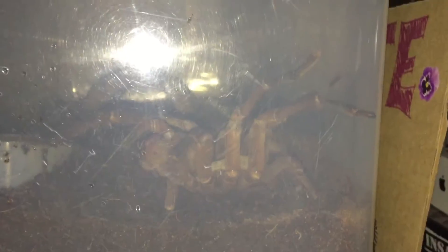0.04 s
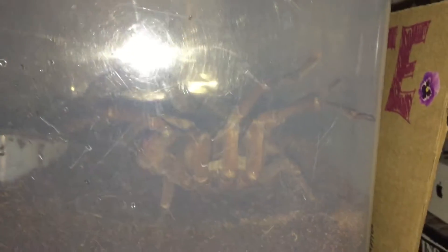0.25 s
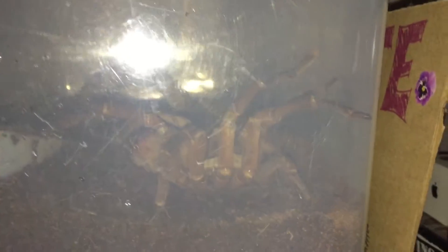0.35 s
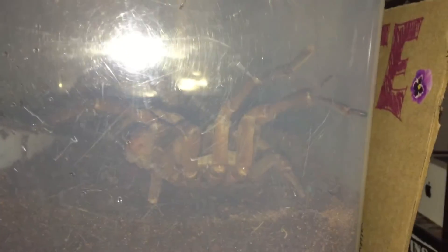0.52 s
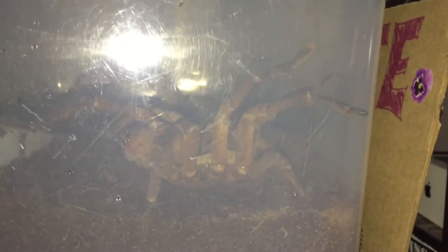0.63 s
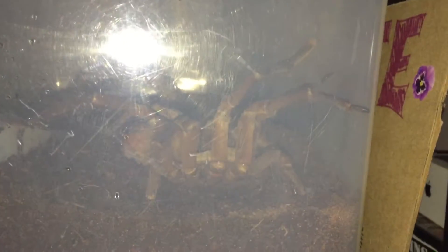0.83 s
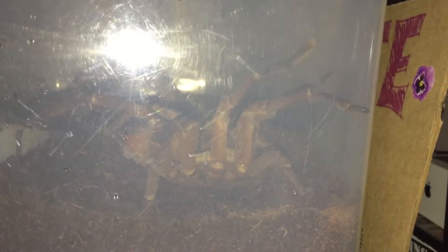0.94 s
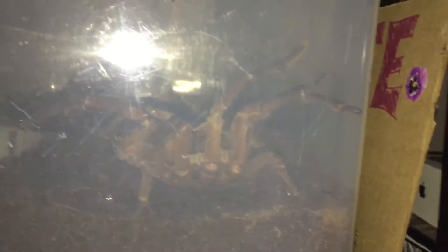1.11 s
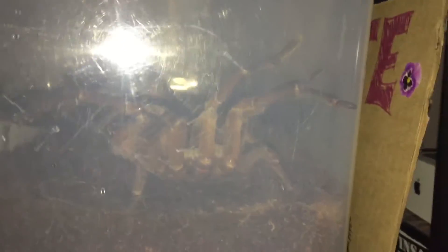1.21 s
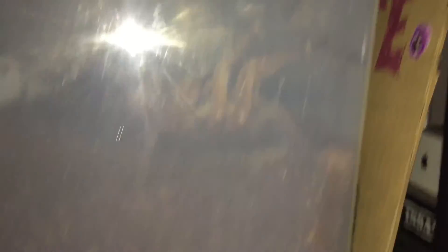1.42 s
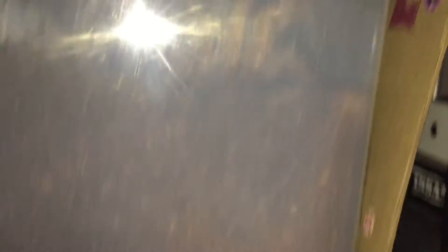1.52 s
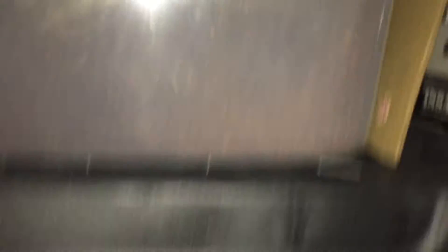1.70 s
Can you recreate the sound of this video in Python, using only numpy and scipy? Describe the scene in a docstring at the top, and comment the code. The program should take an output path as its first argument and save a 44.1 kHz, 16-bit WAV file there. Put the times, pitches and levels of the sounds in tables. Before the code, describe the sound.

Quick, even, low knocks of a tarantula drumming on a plastic wall, after one small click.

```python
"""One sharp plastic click, close by, over the low hum and quiet hiss of a small room.
Then a tarantula drums nine times on its plastic enclosure, about seven knocks a second, with soft
thuds in between and tiny claw scratches. Each knock rings the same wall, whose bending waves bring
the treble ahead of the bass. The room answers briefly; one microphone hears it all."""
import sys
import numpy as np
from scipy import signal
from scipy.fft import rfft, irfft, next_fast_len
from scipy.io import wavfile

SR = 44100
rng = np.random.default_rng(int(sys.argv[2]) if len(sys.argv) > 2 else 0)


def wav_out(sig):
    """Save sig, one row per channel (or a flat mono array), as 16-bit PCM at SR to the path in sys.argv[1]."""
    wavfile.write(sys.argv[1], SR, np.round(np.clip(np.atleast_2d(sig).T, -1, 1) * 32767).astype(np.int16))


N = 77175


def amp(db):
    """Decibels to gain."""
    return 10 ** (np.asarray(db) / 20)


def unit(x):
    """Scale to rms 1."""
    return x / np.sqrt(np.mean(x ** 2) + 1e-20)


def since(start):
    """Seconds since start, zero before."""
    return np.maximum(np.arange(N) / SR - start, 0)


def fade(t, t60):
    """Exponential decay, 60 dB down after t60 seconds."""
    return 1000 ** (-t / t60)


def curve(points):
    """(t/s, value) points joined by straight lines, one value per sample."""
    return np.interp(since(0), *np.transpose(points))


def filtered(x, response):
    """x through a gain that depends on frequency."""
    size = next_fast_len(N + SR // 2)
    return irfft(rfft(x, size) * response(np.fft.rfftfreq(size, 1 / SR)), size)[:N]


def coloured(x, spectrum):
    """x shaped by (f/Hz, gain/dB) points on a log frequency axis."""
    points_hz, db = np.transpose(spectrum)
    return filtered(x, lambda hz: amp(np.interp(np.log(hz + 1), np.log(points_hz), db)))


def noise(spectrum):
    """Coloured noise of rms 1."""
    return unit(coloured(rng.standard_normal(N), spectrum))


def ring(start, hz, t60, rise_cycles=.688):
    """One mode that builds up from its start and dies away."""
    t = since(start)
    return np.sin(2 * np.pi * hz * t) * fade(t, t60) * (1 - np.exp(-t * hz / rise_cycles))


def burst(start, spectrum, t60):
    """A short crack of noise."""
    t = since(start)
    return noise(spectrum) * (t > 0) * fade(t, t60)


# Colour of the room's answer: f/Hz, gain/dB
ROOM_SPECTRUM = [(80, -26), (150, -20), (280, -3), (450, -6), (650, -6.5), (850, -3), (1200, -4), (1550, 5),
                 (2600, -2), (3600, 3.5), (5000, 8), (12000, -10)]
def in_room(direct, send_db=-10, t60=0.14, build_s=0.0064):
    """The direct sound, then the short, diffuse tail of a small room, which holds little bass."""
    t = np.arange(SR // 3) / SR
    tail = rng.standard_normal(len(t)) * fade(t, t60) * (1 - np.exp(-(t / build_s) ** 2))
    low_cut = signal.butter(3, 220, "high", fs=SR, output="sos")
    tail = signal.sosfilt(low_cut, tail / np.linalg.norm(tail))
    reverb = coloured(signal.fftconvolve(direct, tail)[:N], ROOM_SPECTRUM)
    return direct + amp(send_db) * reverb


# Room tone around the microphone: f/Hz, relative level/dB
ROOM_TONE_SPECTRUM = [(20, 3), (45, -28), (70, 0), (120, 3.5), (170, -10.5), (330, -13), (500, -9),
                      (680, -18.5), (1500, -20.5), (2600, -22.5), (3500, -32), (6000, -35), (10000, -40),
                      (16000, -43.5)]
# Its slight drift: t/s, level/dB
ROOM_TONE_LEVEL = [(0, -56), (.18, -56), (.25, -54), (1.25, -56), (1.5, -57), (1.75, -57)]
def room_tone():
    """A nearly steady bed of rumble and quiet hiss."""
    return amp(curve(ROOM_TONE_LEVEL)) * noise(ROOM_TONE_SPECTRUM)


# Swells and dips of the hum's fundamental: t/s, level/dB
HUM_LEVEL = [(0.0, -77), (0.204, -60), (0.262, -59), (0.574, -52.5), (0.638, -80), (0.686, -66),
             (0.9, -46.5), (1.184, -48), (1.48, -55.5), (1.52, -88), (1.696, -56), (1.75, -56)]
def hum(hz=58.8, octave_db=-63):
    """A low hum in the room, wavering under its steady octave."""
    phase = 2 * np.pi * hz * since(0)
    return amp(curve(HUM_LEVEL)) * unit(np.sin(phase)) + amp(octave_db) * unit(np.sin(2 * phase))


# A whine far in the background: t/s, level/dB
WHINE_LEVEL = [(0, -71.5), (.5, -67.5), (.95, -69), (1.06, -64), (1.13, -69.5), (1.24, -62), (1.35, -70),
               (1.75, -73.5)]
def whine(centre_hz=1212, half_width_hz=54):
    """A faint, fuzzy tone: a narrow band of noise."""
    band = filtered(rng.standard_normal(N), lambda hz: 1 / (1 + ((hz - centre_hz) / half_width_hz) ** 2))
    return amp(curve(WHINE_LEVEL)) * unit(band)


# Claws on the plastic, close and dry: t/s, level/dB
CLAW_SKIDS = [(.528, -66), (.544, -75), (.6698, -59.5), (0.834, -60), (0.839, -54), (1.1388, -57),
              (1.4627, -61), (1.467, -58.5)]
# Their thin rasp: f/Hz, relative level/dB
CLAW_SPECTRUM = [(2000, -16), (4000, 1), (7000, -1), (11000, -5.5), (15000, -2.5)]
def scratches(width_s=0.0011):
    """A claw skids for a millisecond or two just before or after some blows."""
    envelope = sum(amp(db) * np.exp(-np.abs(since(0) - peak) / width_s) for peak, db in CLAW_SKIDS)
    return envelope * noise(CLAW_SPECTRUM)


# Soft contacts on the wall, around the knocks: t/s at the peak, level/dB, f/Hz
SOFT_CONTACTS = [(0.211, -47, 130), (.351, -41, 171), (0.4952, -30, 168), (0.6213, -34.5, 160),
                 (0.7675, -30, 176), (.9, -38, 137), (1.0608, -30, 163), (1.206, -64, 138),
                 (1.362, -59, 101)]
def thuds(width_s=0.0036, sag_per_s=32, ring_db=-4):
    """A soft contact gives a rounded bump of falling pitch and leaves only the lowest mode ringing."""
    lowest_mode_hz = WALL_MODES[0][0]
    out = np.zeros(N)
    for peak, db, hz in SOFT_CONTACTS:
        t = since(0) - peak
        phase = 2 * np.pi * hz * t * (1 - .5 * sag_per_s * t)
        bump = -np.cos(phase) * np.exp(-.5 * (t / width_s) ** 2)
        out += amp(db) * (bump + amp(ring_db) * ring(peak, lowest_mode_hz, t60=0.12))
    return out


# Modes of the clicking plastic: f/Hz, relative level/dB, t60/s
PLASTIC_MODES = [(688, -10.5, 0.061), (1156, -13, 0.044), (1463, -4.5, 0.038), (1750, -5, 0.031),
                 (2220, -6, 0.021), (2760, -3.5, 0.019), (3800, -14, .012), (3985, -1.5, 0.017),
                 (4250, -1.5, 0.022), (6020, -10, .018)]
# The crack at its onset: f/Hz, relative level/dB
CRACK_SPECTRUM = [(400, -10), (1000, 4.5), (4400, 0.5), (5000, -23), (6200, -3.5), (8500, -14),
                  (11000, -20), (16000, -39)]
def click(start=.2175, modes_db=-35, crack_db=-36.5, top_hz=9150):
    """One small, bright snap of plastic: a crack of noise and a brief ring."""
    modes = sum(amp(db) * ring(start, hz, t60, rise_cycles=0.39) for hz, db, t60 in PLASTIC_MODES)
    snap = amp(modes_db) * modes + amp(crack_db) * burst(start, CRACK_SPECTRUM, t60=0.019)
    return signal.sosfilt(signal.butter(2, top_hz, fs=SR, output="sos"), snap)


# Modes of the enclosure wall: f/Hz, relative level/dB, t60/s
WALL_MODES = [(118.2, -21, 0.058), (190, -38, 0.16), (227, -42.5, 0.15), (370.6, -53, 0.2),
              (420, -48, 0.21), (456.3, -35, 0.087), (481.2, -42, 0.15), (542.4, -8.5, 0.0085),
              (569.3, -38.5, 0.084), (695.2, -28.5, 0.042), (742, -56, 0.21), (1085.6, -23, 0.0081),
              (1204, -21, 0.0079), (1429.6, -27.5, 0.00715), (1784, -44.5, 0.025), (2146, -38.5, 0.022),
              (2234, -37, 0.022), (2393, -43, 0.048), (2577, -39.0, 0.025), (2700, -41.5, 0.041),
              (3002, -33.5, 0.01), (3223, -51, 0.059), (3442, -40.5, 0.01)]
# A padded leg excites little treble: f/Hz, gain/dB
LEG_SPECTRUM = [(600, 0), (3000, 0.5), (3750, 2.5), (4700, -25), (16000, -20)]
def struck_wall(travel_s_at_1khz=.001904, dispersion=.635):
    """A leg pushes the wall in and sets it ringing; low bending waves travel slowest."""
    wall = np.zeros(N)
    for hz, db, t60 in WALL_MODES:
        arrival = travel_s_at_1khz / (hz / 1000) ** dispersion
        wall -= amp(db) * ring(arrival, hz, t60)
    return coloured(wall, LEG_SPECTRUM)


# Blows on the wall, near the microphone: t/s, wall gain/dB, extra treble/dB, tick gain/dB
BLOWS = [(.265, -.5, -0.5, -9.5), (0.4004, -1.54, -1.5, -10), (.543, 1, 0.5, 0), (.6795, 0.14, 0.5, -4),
         (0.8325, 0, 0, 0.5), (0.9687, -1.5, 0, -7), (1.1388, 0.3, 0, -3), (1.2901, -1, -0.5, -6),
         (1.459, -2.8, 0, -11)]
# The tick of hard contact: f/Hz, relative level/dB
TICK_SPECTRUM = [(300, -30), (900, 14.5), (1500, -16), (2200, -6), (3400, 7.5), (4100, -4), (4600, -11.5),
                 (5600, -9), (7000, -16), (15000, -17)]
def knocks(lead_s=.00132, bass_hz=260, treble_hz=2200, tick_base_db=-46.5):
    """The tarantula drums: each blow ticks on contact, rings the same wall and carries into the room."""
    wall = struck_wall()
    out = np.zeros(N)
    for start, db, treble_db, tick_db in BLOWS:
        delay = round((start - lead_s) * SR)  # the wall's treble arrives with the tick
        ringing = np.pad(wall, (delay, 0))[:N]
        ringing = coloured(ringing, [(bass_hz, db), (treble_hz, db + treble_db)])
        tick = amp(tick_base_db + tick_db) * burst(start, TICK_SPECTRUM, t60=.035)
        out += in_room(ringing + tick)
    return out


def scene():
    """Beside the enclosure in a small room; the click is almost dry."""
    enclosure = knocks() + in_room(thuds()) + in_room(click(), send_db=-27) + scratches()
    background = room_tone() + hum() + whine()
    return (background + enclosure)[None]


def record(dry):
    """The mono microphone drops the deepest bass and keeps nothing above its band limit."""
    low_cut_hz, top_hz = 46, 16100
    return filtered(dry[0], lambda hz: (hz < top_hz) * (1 - 1 / (1 + (hz / low_cut_hz) ** 6)))[None]


dry = scene()
out = record(dry)
wav_out(out)
```